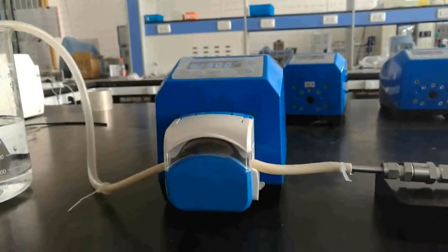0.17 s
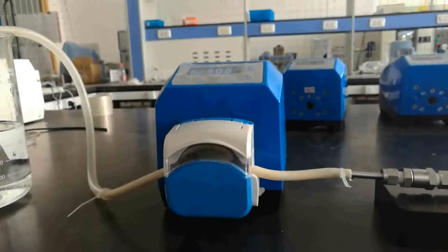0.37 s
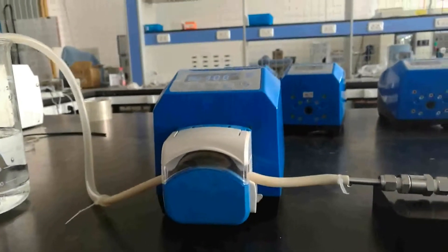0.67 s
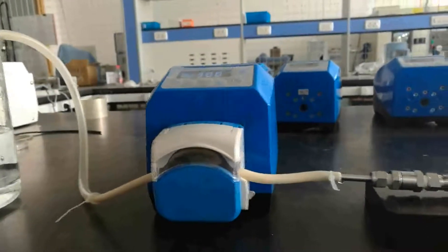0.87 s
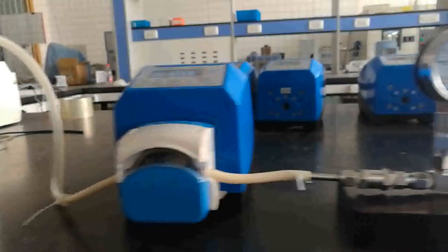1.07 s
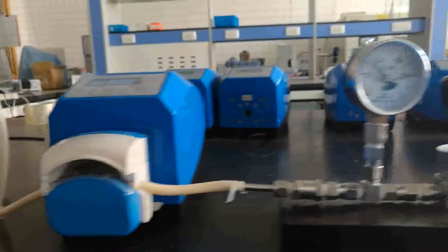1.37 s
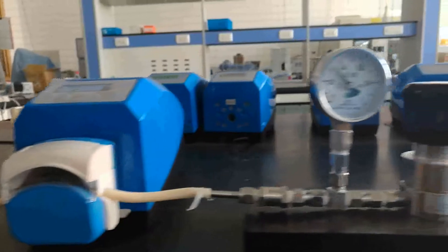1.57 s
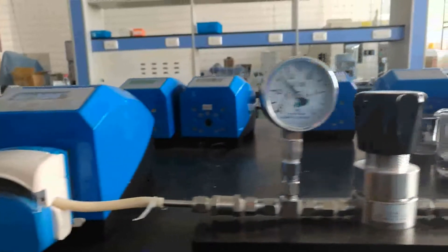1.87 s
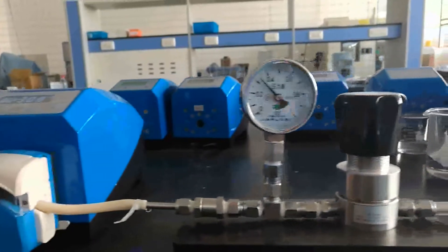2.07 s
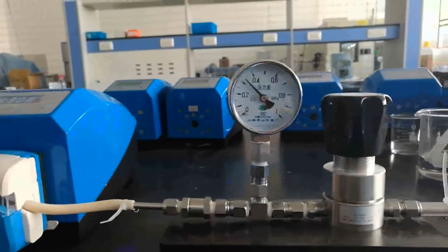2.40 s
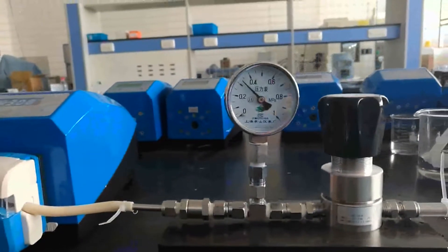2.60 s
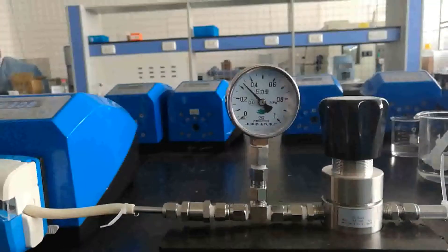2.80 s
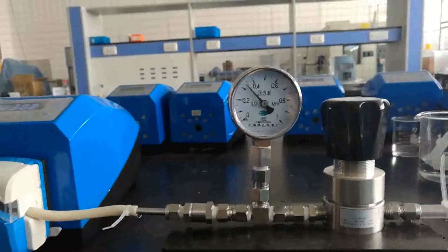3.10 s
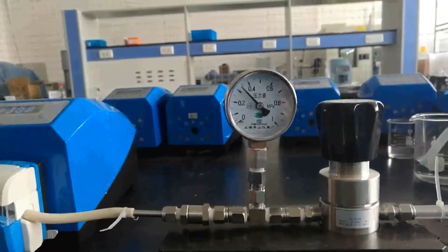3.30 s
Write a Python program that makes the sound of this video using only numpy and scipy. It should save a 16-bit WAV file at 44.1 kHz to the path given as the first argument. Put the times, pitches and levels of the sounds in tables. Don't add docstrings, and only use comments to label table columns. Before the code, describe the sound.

A peristaltic pump clatters rapidly on a lab bench over a steady gear whine and hiss

```python
import sys
import numpy as np
from scipy import signal
from scipy.io import wavfile
from scipy.ndimage import uniform_filter1d

SR = 44100
rng = np.random.default_rng(int(sys.argv[2]) if len(sys.argv) > 2 else 0)


def gain_from_decibels(decibels):
    exponent = np.asarray(decibels, float) / 20
    return 10 ** exponent


def dump(signal):
    limited = np.clip(np.atleast_2d(signal).T, -1, 1)
    pcm = np.round(limited * 32767).astype(np.int16)
    wavfile.write(sys.argv[1], SR, pcm)


N = 152145

# time [s], share turned [0-1], lag of the left side [samples].
PHONE_TURN = [
    (0, 0.03, 3.36),
    (.7, 0.01, 3.1),
    (1.1, 0.26, 7),
    (1.5, 0.47, 9.5),
    (1.9, 0.49, 12.35),
    (3.45, 0.65, 11.9),
]
# level of rollers 1, 2, 3 and 4 [dB].
CLACK_LEVELS = [(-20.5, -25.5, -27.5, -35), (-22.5, -27, -40, -50), (-26, -23, -31.5, -38),
                (-21, -23.5, -36, -44), (-23.5, -21.5, -31.5, -27.5), (-24, -23, -31.5, -31.5),
                (-22.5, -23, -36, -34), (-25, -24.5, -37, -30), (-25.5, -31, -32, -33),
                (-28, -31, -38, -28), (-33, -28, -41, -28), (-28.5, -25.5, -40, -26), (-26, -29, -48, -31),
                (-35, -23.5, -38, -30), (-29.5, -26.5, -51, -47), (-27, -25, -44, -35),
                (-24.5, -24.5, -47, -40), (-28.5, -24.5, -44, -44)]


def evened(x):
    return x / np.sqrt(np.mean(x ** 2) + 1e-20)


def curve(table, column, t):
    columns = np.transpose(table)
    return np.interp(t, columns[0], columns[column])


def turned(t):
    return np.clip(curve(PHONE_TURN, 1, t), 0, 1)


def slow_drift(size):
    return evened(uniform_filter1d(uniform_filter1d(rng.standard_normal(N), size), size))


def resonate(x, hz, width):
    spin = np.exp(2j * np.pi * hz * np.arange(x.shape[-1]) / SR)
    r = np.exp(-np.pi * width / SR)
    return 2 * (spin * signal.lfilter([1 - r], [1, -r], x / spin)).real


def noise(colour, same, patch_db, size):
    frames, hz = N * 4 // size + 5, np.fft.rfftfreq(size, 1 / SR)
    t = np.arange(frames) * size / 4 / SR
    a, b, c, d, patch = rng.standard_normal((frames, len(hz), 5)).T
    patch = uniform_filter1d(patch, size=3, axis=0)
    patch = evened(uniform_filter1d(patch, size=6, axis=1))
    f, *levels = np.transpose(colour)
    left_facing, left_turned, right_facing, right_turned = [
        np.interp(np.log(hz + 1), np.log(f + 1), db, left=db[0] - 30)[:, None] for db in levels]
    share, same = turned(t), np.clip(same(hz), -1, 1)[:, None]
    left_db = left_facing + share * (left_turned - left_facing)
    right_db = right_facing + share * (right_turned - right_facing)
    lead = np.exp(2j * np.pi * hz[:, None] * curve(PHONE_TURN, 2, t) / SR)
    left = a + 1j * b
    right = same * lead * left + np.sqrt(1 - same ** 2) * (c + 1j * d)
    z = np.array([left, right]) * gain_from_decibels(np.array([left_db, right_db]) + patch_db * patch)
    return evened(signal.istft(z, nperseg=size, noverlap=size * 3 // 4)[1][:, :N])


def bursts(times, dbs, long_s):
    train, t = np.zeros(N + SR), np.arange(-300, 301) / SR
    train[(times * SR).astype(int)] = gain_from_decibels(dbs)
    return signal.oaconvolve(train, np.exp(-.5 * (t / long_s) ** 2), "same")[:N]


def air():
    # frequency [Hz], level [dB per Hz].
    air_colour = [(15, -42), (25, -7), (50, -16), (80, -9.5), (156, -12), (261, -1.5), (372, -8.5),
                  (406, -8), (538, -13.5), (733, -12.5), (850, -34), (1100, -19), (1870, -120)]
    # frequency [Hz], left-right likeness [0-1].
    air_likeness = [(60, 0.87), (130, 0.93), (290, 0.86), (500, 0), (900, 0.83)]
    colour = [(hz, db, db, db, db) for hz, db in air_colour]
    return gain_from_decibels(-55.5) * noise(colour, lambda hz: curve(air_likeness, 1, hz), 0.92, size=2048)


def hand():
    # time [s], level [dB].
    grip_level = [
        (0, -78),
        (.33, -62.5),
        (.4, -47.5),
        (.55, -53),
        (.62, -58.5),
        (.72, -62),
        (.8, -67),
        (.9, -80),
    ]
    # frequency [Hz], level [dB].
    body_modes = [(72, -1), (110, 0), (260, -13), (400, -9.5), (520, -6)]
    rub = rng.standard_normal(N)
    body = sum(gain_from_decibels(db) * resonate(rub, hz, width=15.5) for hz, db in body_modes)
    level_db = curve(grip_level, 1, np.arange(N) / SR) + slow_drift(size=600)
    return gain_from_decibels(level_db) * evened(uniform_filter1d(body, size=60))


def motor():
    # frequency [Hz], left facing, left turned, right facing, right turned [dB].
    hiss_colour = [(790, -0.5, -6.5, 2.5, 5), (1760, 0, 2, -4.5, -9), (2230, -10, 0.5, -8, -9.5),
                   (4400, 3.5, 4.5, 0.5, -17), (6400, -9, -12.5, -34, -2), (7440, -15, -10, -17, -11),
                   (8000, -24, -17, -24, -22), (8600, -14, -5, -14, -13), (9900, -9, -4.5, -9, -8),
                   (15400, -5, -8.5, -9.5, -8.5)]
    sing_hz, sing_width_hz = 12960, 410
    sing = resonate(rng.standard_normal((N, 2)).T, sing_hz, sing_width_hz)
    sing = evened(resonate(sing, sing_hz, sing_width_hz))
    hiss = noise(hiss_colour, lambda hz: 0.38 + 0 * hz, patch_db=4, size=256)
    return gain_from_decibels(-45.5) * hiss + gain_from_decibels(-56.5 + 3.0 * slow_drift(size=300)) * sing


def whine():
    # time [s], left [dB], right [dB], lead of the left side [rad].
    tones = [
        [(0, -49, -46.5, 1.9), (.95, -49, -46.5, 1.8), (1.3, -48, -49.5, 2), (1.9, -48.5, -53, 2.2),
         (2.3, -49, -55, 2.5), (3.45, -48.5, -54, 2.4)],
        [(0, -53, -50, 2.7), (.4, -51, -48.5, 2.7), (.7, -56, -50.5, 2.7), (.95, -49, -54, 3.8),
         (1.1, -46, -53, 5.2), (1.25, -47, -47, 6.7), (1.4, -42, -50, 6.9), (1.65, -41, -69, 6.3),
         (2, -45, -65, 6.2), (2.3, -43, -56, 6), (2.8, -43.5, -54.5, 6), (3.05, -41, -54, 5.9),
         (3.45, -41, -54, 5.8)],
        [(0, -44, -64, -2), (.95, -44.5, -67, -2), (1.1, -46, -69, -3), (1.25, -52, -59, -3.9),
         (1.4, -64, -60, -2.6), (1.55, -70, -71, -1.7), (1.85, -58, -65, 0), (2.2, -51, -67, 0),
         (2.55, -55, -66, 0), (2.8, -51.5, -70, 0), (3.45, -51, -67, 0)],
    ]
    orders = [1, 4, 5]
    mesh_hz, waver_db, wander_rad = 915.65, 1, 0.38
    t, out = np.arange(N) / SR, np.zeros((2, N))
    for order, tone in zip(orders, tones):
        angle = 2 * np.pi * order * mesh_hz * t + wander_rad * slow_drift(size=1500)
        for ear in (0, 1):
            db = curve(tone, 1 + ear, t) + waver_db * slow_drift(size=500)
            out[ear] += np.sqrt(2) * gain_from_decibels(db) * np.sin(angle - ear * curve(tone, 3, t))
    return out


def knock_times():
    first_s, roller_s, slip_at_s, slip_s = .0137, .050125, 1.08, .0236
    s = first_s + np.arange(4 * len(CLACK_LEVELS)) * roller_s
    return s - slip_s * (s > slip_at_s)


def scrape():
    # frequency [Hz], left facing, left turned, right facing, right turned [dB].
    scrape_colour = [(900, -2, -12, -7, -7), (2560, -11, -9.5, -14, -24), (4150, -4, -5, -4.5, -12),
                     (8000, -14, -15.5, -15.5, -12.5), (9500, -3, 1, -5.5, -5), (11400, -4, -17, -5.5, 1),
                     (13700, -6.5, -11, -3.5, -2.5), (15700, 8, -18, -16, -26), (15900, -11, -29, -29, -29)]
    # time from the knock [s], level [dB].
    squeeze = [
        (-.026, -30),
        (-.018, -14.5),
        (-.010, -7),
        (-.002, 3.5),
        (.002, 1.5),
        (.009, -0.5),
        (.014, -5.5),
        (.0165, -48),
        (.026, -37),
    ]
    scatter_db, snap_after_s, snap_db, snap_long_s = 2, 0.01145, 3, 0.0012
    t, power = np.arange(N) / SR, np.zeros(N)
    for s in knock_times():
        near = slice(max(round((s - .03) * SR), 0), round((s + 0.04) * SR))
        db = curve(squeeze, 1, t[near] - s) + scatter_db * rng.standard_normal()
        power[near] += gain_from_decibels(2 * db)
    snaps = knock_times() + snap_after_s
    power += bursts(snaps, snap_db + 1.7 * rng.standard_normal(len(snaps)), snap_long_s) ** 2
    friction = noise(scrape_colour, lambda hz: 0.15 + 0 * hz, patch_db=3, size=128)
    return gain_from_decibels(-42.5) * np.sqrt(power) * friction


def ring(modes, extra_db, s, db, rise_s):
    scatter_db, detune = 2.5, 0.025
    hz, t60, left_facing, left_turned, right_facing, right_turned = np.transpose(modes)[:, :, None]
    luck, t, share = rng.standard_normal((4, len(modes), 1)), np.arange(1600) / SR, turned(s)
    swell = 1 - np.exp(-(t / rise_s) ** 2)
    shape = gain_from_decibels(-85 * t / t60) * swell * gain_from_decibels(scatter_db * luck[0] + extra_db)
    angle = 2 * np.pi * hz * (1 + detune * luck[1]) * t + 2 * luck[2]
    left_gain = gain_from_decibels(left_facing + share * (left_turned - left_facing))
    right_gain = gain_from_decibels(right_facing + share * (right_turned - right_facing))
    left = (left_gain * shape * np.sin(angle)).sum(0)
    right = (right_gain * shape * np.sin(angle + 0.22 * luck[3])).sum(0)
    return gain_from_decibels(db) * np.array([left, right]) / np.sqrt(2 * np.mean(left[:190] ** 2))


def add(mix, s, sound, lag=1):
    for ear, lead in enumerate((0, lag * curve(PHONE_TURN, 2, s))):
        i = round(s * SR - lead)
        part = mix[ear, max(i, 0):][:sound.shape[1] + min(i, 0)]
        part += sound[ear, max(-i, 0):][:len(part)]


def rollers():
    # level of rollers 1, 2, 3 and 4 [dB].
    knock_levels = [(-34, -28, -41, -39.0), (-30, -29.5, -42, -42), (-31, -30.5, -48.0, -54),
                    (-41, -32.5, -56, -56), (-33.5, -35, -52.0, -38), (-28, -27.5, -62.0, -34),
                    (-36.0, -35, -43.0, -36), (-30, -26.5, -40, -43), (-34, -25, -34, -39),
                    (-29, -26.5, -39.0, -32), (-32, -25.5, -40, -36.5), (-52, -24, -35.5, -28.5),
                    (-33, -25, -51.0, -29), (-27.0, -25, -43.0, -30), (-26, -26, -36.5, -28.5),
                    (-30.5, -27, -41, -37), (-36.0, -25.5, -42, -39.0), (-27.5, -24, -41.0, -41.0)]
    # level of rollers 1, 2 and 4 [dB].
    thud_levels = [(-27.5, -41, -60), (-28, -35, -43), (-26, -30.5, -65), (-26, -32.5, -63),
                   (-28.0, -31.5, -33.5), (-30.5, -28.5, -48), (-28.5, -34.5, -49), (-28.5, -34.5, -62),
                   (-33, -44, -48), (-28, -40, -39), (-32, -35, -30.5), (-29, -32.5, -40),
                   (-32.5, -32.5, -38), (-29.5, -34.5, -39), (-29.5, -35.5, -39), (-28.5, -31, -37),
                   (-29.5, -32, -42), (-31.5, -37, -35.0)]
    # frequency [Hz], time to fall by 85 dB [s], left facing, left turned,
    # right facing, right turned [dB].
    low_modes = [(1127, 0.012, 1.5, 6, -1.5, 3.5), (1714, 0.018, 0.5, -2.5, -7, -14.5),
                 (2062, 0.021, -8.5, -5.5, -28, 0)]
    high_modes = [(2711, 0.015, -11, -8, -17.5, -17.5), (3103, 0.016, -18, 5, -25, -31),
                  (3600, 0.014, -14.5, 0.5, -55.5, -25), (4168, 0.012, 2, -2.5, -44, -23),
                  (4700, 0.011, -3, -9.5, -10, -14), (5320, 0.01, -4.5, -16.5, -21.5, -8)]
    # frequency [Hz], left facing, left turned, right facing, right turned [dB].
    crack_colour = [(1620, -19.5, -13, -34, -29), (4130, -1.5, 0.5, -19.5, -1),
                    (8100, -11.5, -7.5, -24, -14.5), (12100, -3.5, -8, -5, -15), (15400, -6, -13, -19, -15)]
    clack_early = [0, 0, .0035, 0]
    lowest_extra = [0, -6.5, 10, -7.5]
    rise_s, thud_rise_s, thud_early_s = 0.0011, .002, .0019
    rebound_s, rebound_db, touch_s, touch_db = 0.00417, -6, .0036, -39
    out, times = np.zeros((2, N)), knock_times()
    clacks, knocks = np.ravel(CLACK_LEVELS), np.ravel(knock_levels)
    thuds = np.insert(np.array(thud_levels, float), obj=[2], values=-50, axis=1).ravel()
    for k, (s, clack, knock, thud) in enumerate(zip(times, clacks, knocks, thuds)):
        lowest = np.array([[lowest_extra[k % 4]], [0], [0]])
        chance = rng.standard_normal(2)
        hit = s - 1.6 * rise_s
        rebound = hit + rebound_s * (1 + 0.143 * chance[1])
        sounds = [
            (hit - clack_early[k % 4], ring(high_modes[2:], 0, s, clack, rise_s), 1),
            (hit, ring(high_modes[:2], 0, s, knock, rise_s), 1),
            (s - thud_early_s, ring(low_modes, lowest, s, thud, thud_rise_s), .5),
            (rebound, ring(low_modes[1:2], 0, s, thud + rebound_db, thud_rise_s), .5),
            (hit - touch_s, ring(high_modes[2:5], 0, s, touch_db + 3 * chance[0], rise_s), 1)]
        for at, sound, lag in sounds:
            if at < N / SR:
                add(out, at, sound, lag)
    crack = noise(crack_colour, lambda hz: .92 + 0 * hz, patch_db=3, size=64)
    return out + bursts(times, np.maximum(clacks, knocks) - 4, long_s=0.00071) * crack


def room(x):
    t60 = 0.13
    t = np.arange(8000) / SR
    tail = rng.standard_normal((8000, 2)).T * gain_from_decibels(-60 * t / t60) * (t > .002)
    return gain_from_decibels(-11.5) * signal.oaconvolve(x, tail / np.linalg.norm(tail[0]), axes=1)[:, :N]


def scene():
    knocks = rollers()
    return knocks + room(knocks) + scrape() + whine() + motor() + air() + hand()


def roll_off(x):
    return signal.sosfilt(signal.butter(12, 16150, fs=SR, output="sos"), x)


def record(dry):
    low_pass = signal.firwin(1023, 15950, window=("kaiser", 9), fs=SR)
    limited = signal.oaconvolve(dry, low_pass[None], "same")
    return roll_off(limited)


dry = scene()
out = record(dry)
dump(out)
```